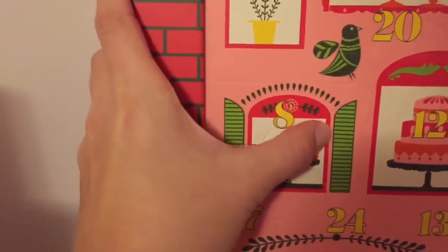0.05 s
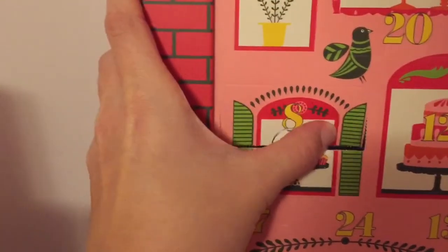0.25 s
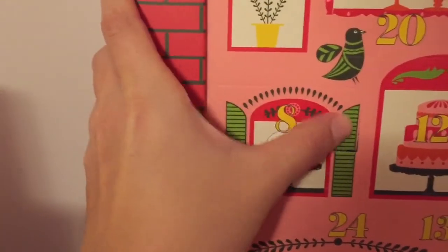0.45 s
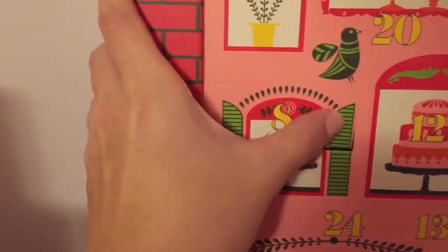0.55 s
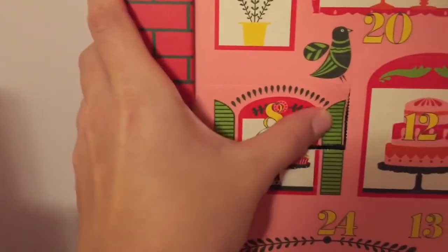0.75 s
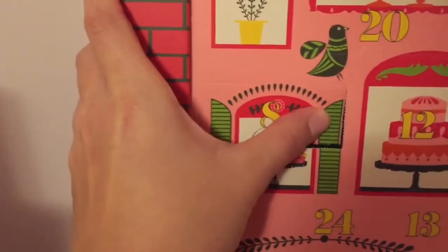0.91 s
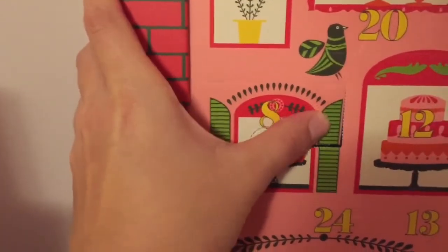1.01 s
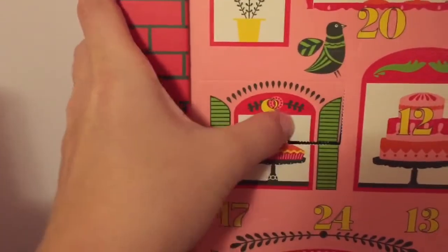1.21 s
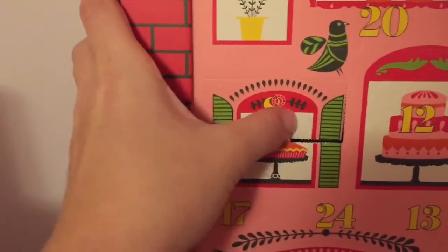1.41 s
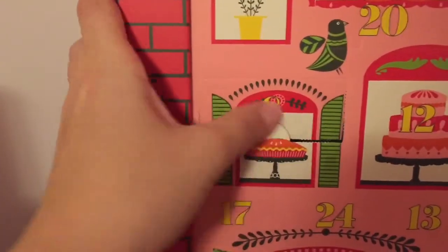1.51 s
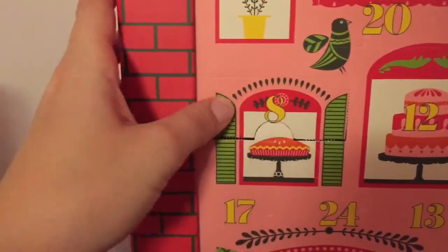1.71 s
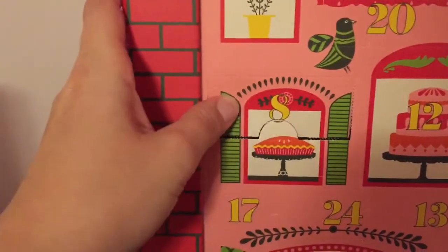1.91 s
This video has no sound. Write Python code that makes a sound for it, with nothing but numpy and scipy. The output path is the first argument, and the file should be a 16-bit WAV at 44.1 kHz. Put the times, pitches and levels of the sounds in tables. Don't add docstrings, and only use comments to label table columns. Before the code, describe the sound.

Cardboard flap tearing loose: a loud bright snap, crackling fibres, another big snap, then faint skin rubs

```python
import sys
import numpy as np
from scipy import signal
from scipy.fft import rfft, irfft
from scipy.io import wavfile
from scipy.ndimage import uniform_filter1d

SR = 44100
rng = np.random.default_rng(int(sys.argv[2]) if len(sys.argv) > 2 else 0)


def undo_db(level):
    steps = np.asarray(level, float) / 20
    return 10 ** steps


def waveform_to_disk(signal):
    frames = np.transpose(np.atleast_2d(signal))
    scaled = np.clip(frames, -1, 1) * 32767
    samples = np.round(scaled).astype(np.int16)
    wavfile.write(sys.argv[1], SR, samples)


N = 85995

# frequency in Hz, density in dB per Hz.
ROOM_SPECTRUM = [(18, -48.5), (30, -19), (71, -4), (384, -17.5), (511, -26.5), (735, -22.5), (794, -32),
                 (1090, -24.5), (15000, -39)]
# frequency in Hz, level in dB.
TAIL_COLOUR = [(150, -3.5), (500, -4.5), (1100, -10.5), (1900, -9.5), (3800, -3), (5300, -12.5),
               (7000, -4.5), (14000, -11)]
# frequency in Hz, level in dB, 60 dB decay time in seconds.
PANEL_MODES = [(340, -27, .025), (442, -19, 0.0099), (701, -7.5, 0.026), (869, 0.5, 0.015),
               (1071, 1.5, 0.017), (1632, 0.5, 0.011), (1703, -5.5, 0.011), (1832, -6.5, 0.031),
               (2401, 0.5, 0.0073), (2490, -0.5, 0.0054), (3380, -4, 0.006), (4260, -7.5, 0.011),
               (5368, -7, 0.0087), (6960, -22.5, .004)]
# frequency in Hz, level in dB.
CRACK_COLOUR = [(500, -26), (1500, 3.5), (3000, 5.5), (5500, 7.5), (8000, 5), (12000, 4.5), (15000, 0.5)]
# frequency in Hz, level in dB.
BEHIND_THUMB = [(8500, 0.5), (13000, -20)]
# frequency in Hz, density in dB per Hz.
SKIN_COLOUR = [(880, -28.5), (1150, -11), (1900, -10.5), (2400, -4), (3500, -9), (5500, -4), (9360, -7.5),
               (15000, -12)]
# time in seconds, hiss in dB, drag into the panel in dB.
THUMB_SLIDE = [(0.448, -65.5, -97), (0.462, -44.5, -47), (0.485, -54, -43.5), (0.493, -72, -80),
               (1.068, -72, -63.5), (1.108, -55.5, -64), (1.17, -53, -62.5), (1.20, -50.5, -54),
               (1.274, -68.5, -56), (1.297, -75, -72.5), (1.53, -75, -75), (1.543, -68, -56.5),
               (1.588, -49, -53), (1.628, -55, -60), (1.66, -55, -70.5), (1.738, -54.5, -67),
               (1.778, -70, -62.5), (1.813, -83, -61)]
# start in seconds, level in dB, pitch in Hz, length in ms.
SKIN_SLIPS = [(.2535, -16, 280.5, 2.84), (.281, -29, 303, 1.6), (.2945, -24.5, 1164, 1.4),
              (.317, -42.5, 187, 3.8), (.357, -47.5, 243, 4.2), (.452, -40, 735, 1.2),
              (.458, -37.5, 1045, 1.4), (.4725, -39, 1000, 0.89), (.472, -37.5, 2270, 0.95),
              (.478, -45, 982, 1.24), (1.427, -42.5, 832, 1.7), (1.816, -41, 906, 0.5),
              (1.8205, -40, 637, 1.15), (1.821, -43, 1094, 1.1), (1.828, -46, 940, 1.4),
              (1.17, -56.5, 1060, 1.2), (1.185, -46, 1090, 1.5), (1.195, -43, 1190, 3.3),
              (1.204, -49.5, 1510, 2.6), (1.211, -44.5, 1140, 2.1), (1.2218, -45.5, 1680, 0.59),
              (1.222, -47, 1124, 3.4), (1.235, -44.5, 1044, 2.5), (1.248, -60.5, 2500, 2),
              (1.267, -52, 1130, 1.8), (1.28, -53, 1120, 1.7), (1.538, -46.5, 717, 2.5),
              (1.548, -51.5, 2520, 0.75), (1.552, -44, 985, 1.6), (1.588, -47.5, 1710, 1.1),
              (1.603, -51, 1080, 2.5), (1.614, -45, 1060, 2.1), (1.6905, -46, 2400, 0.95),
              (1.694, -52, 1500, 1.35)]
# start in seconds, level in dB, pitch in Hz, push in ms.
BOX_THUDS = [(0.003, -52, 288, 28), (.247, -11.5, 226.8, 2.3), (0.296, -41.5, 208, 10),
             (0.341, -40, 206, 6), (0.453, -47, 249, 34), (0.4973, -28.5, 261, 1.35), (0.619, -43, 202, 19),
             (0.769, -33, 240, 11), (0.796, -13, 252, 1.76), (.99, -43.5, 180, 5.8),
             (1.193, -51.5, 228, 31), (1.358, -38.5, 198, 59), (1.383, -33, 195, 3.1),
             (1.397, -36, 165, 12.4), (1.667, -48, 149.7, 16.5), (1.814, -49, 170, 14.6),
             (1.846, -47.5, 128.7, 21)]
# start in seconds, level in dB, contact in ms.
PANEL_TAPS = [(.452, -39, 0.87), (.459, -54, 2.8), (.473, -34.5, 1.3), (.497, -49.5, 0.76),
              (.572, -44.5, 0.77), (0.596, -37.5, 4.3), (1.062, -32, 1.9), (1.363, -45.5, 16),
              (1.383, -37, 12), (1.401, -38.5, 2.7), (1.427, -41, 1.73), (1.538, -56, 2.7),
              (1.693, -59.5, 3.1), (1.8158, -33.5, 1.1), (1.8206, -44.5, 0.66)]
# start in seconds, crack
# in dB, panel ring in dB, tearing in ms.
FAINT_TICKS = [
    (.971, -49.5, -63, .6),
    (1.038, -54.5, -65, 1.7),
    (1.0565, -48, -65, 0.75),
    (1.366, -48, -50.5, .8),
    (1.4145, -41.5, -67, 2.5),
    (1.427, -42.5, -67, 0.58),
    (1.538, -46.5, -61.5, 0.81),
]
# start in seconds, crack in dB, panel ring in dB, tearing in ms.
DOOR_TEARS = [(.0273, -46.5, -51, 1.6), (.2255, -47, -36, 2.4), (.2438, -33.5, -48.5, 1.7),
              (.2553, -22.5, -14, 1), (.2583, -16, -25, 0.77), (.2622, -27, -15.5, 1.94),
              (.2858, -31.5, -21, 0.97), (.2945, -23, -19.5, 0.65), (.380, -34, -44.5, 1.3),
              (.402, -31, -49, 1.8), (.4128, -37, -38.5, 0.23), (.430, -52.5, -46, 0.76),
              (.4635, -52, -70, 1.4), (.572, -51, -39.5, 0.78), (.604, -47, -53.5, 0.72),
              (.6075, -26, -41, 5.3), (.634, -42.5, -43.5, 0.57), (.6365, -35.5, -41, 0.43),
              (.654, -54.5, -48.5, 0.91), (.6832, -42.5, -46.5, 1.5), (.6935, -39, -35, 0.66),
              (.713, -26, -72.5, 2.5), (.719, -49.5, -42.5, 1.5), (.750, -46, -42, 0.67)]
# start in seconds, crack in dB, panel ring in dB, tearing in ms.
LATE_FIBRES = [(.755, -58, -42, 0.72), (.758, -27, -63, 2.8), (.8025, -19.5, -38, 1.7),
               (.819, -35, -62, 0.99), (.823, -28, -65, 3.4), (.838, -40, -61, 0.39), (.850, -45, -54, 0.4),
               (.8515, -24, -53, 1.47), (.9545, -37, -75, 0.33), (.962, -40.5, -86, 0.67),
               (1.0076, -27.5, -49, 0.29), (1.062, -36, -50.5, 12), (1.0897, -21.5, -43.5, 0.4),
               (1.103, -35, -44, 1), (1.220, -54, -55, 1.22), (1.257, -42.5, -56, 0.94),
               (1.342, -33, -45, 0.54), (1.4145, -59.5, -46, 2.34), (1.427, -37.5, -70, 0.57),
               (1.550, -47.5, -66, 0.52), (1.587, -57, -54.5, 1.3), (1.8165, -50.5, -47, 0.49),
               (1.9465, -40.5, -36.5, 2)]
# start in seconds, crack in dB, panel ring in dB, tearing in ms, ring tilt in dB per octave.
WHOLE_BRIDGES = [
    (.2461, -13, -1.5, 1.22, 0),
    (.2484, -2, -0.5, 0.48, 3),
    (.7688, -13.5, -19, 0.08, 0.5),
    (.7967, -11, -0.5, 0.3, 1),
]
# one bridge, a level in dB per panel mode.
BRIDGE_SPOTS = [(3, 5.5, 5.5, 1, 4, 6, 2.5, -3.5, -8.5, -8, 0, -4.5, -1.5, 6),
                (0, 2.5, 3, -5.5, -2, 5, -1, -5, 3, -6, -1, -5, 6, 2.5),
                (-1.5, 0, 0.5, -6, 2.5, -6.5, -4.5, -6, 3, 9.5, 7, 7, -4, 6.5),
                (2.5, 4, 3, 4, 2, -8.5, -5.5, -15.5, 3.5, 1, -3.5, -6.5, -0.5, -4.5)]

ROOM_DB = -65.5
TAIL_DB, TAIL_T60_S, TAIL_HIGH_T60_S, TAIL_START_S = -11, 0.18, 0.14, 0.0037
BEND_LAG_S, NEAR_LAG_S, BEND_REF_HZ = 0.0028, 0.0007, 500
MODE_SCATTER_DB, MODE_SCATTER_RATIO, BRIDGE_SCATTER = 2, 0.025, 0.4
CREEP_PER_S, CREEP_START_S, CREEP_END_S = 1200, 0.228, 0.95
CREEP_DB, CREEP_SPREAD_DB, CREEP_RING_DB = -62, 2.5, -9.5
FLICKER_DB, STICK_DB = -0.5, 2.5
FIRST_DRAG_TILT_DB_OCT, SECOND_DRAG_TILT_DB_OCT, SECOND_STROKE_S = -8.5, 1.9, 0.83
DRAG_RING = 1.2
THUD_T60_S, THUD_SUB_DB = 0.023, -16.5
TAP_TILT_DB_OCT = -7
CRACK_SCATTER_DB = 1.5
RUSH_DB, RUSH_MS = -10.5, 4
MIC_LOW_HZ, CLIP, TOP_HZ = 100, 1.0, 15300


def unit(x):
    return x / np.sqrt(np.mean(x ** 2))


def colour(x, table, shift_db=0):
    hz, db = np.array(table, float).T
    f = np.maximum(np.arange(513) * SR / 1024, 1)
    log_gain = np.interp(np.log(f), np.log(hz), db + shift_db) * np.log(10) / 20
    cepstrum = irfft(log_gain)
    cepstrum[1:512] *= 2
    cepstrum[513:] = 0
    impulse = irfft(np.exp(rfft(cepstrum)))[:512]
    return signal.fftconvolve(x, impulse)[:len(x)]


def walk(rate):
    hold = int(SR / rate)
    steps = np.repeat(rng.standard_normal(N // hold + 1), hold)
    return 1.6 * uniform_filter1d(steps, hold)[:N]


def add(out, x, s):
    i = int(s * SR)
    out[i:i + len(x)] += x[:max(len(out) - i, 0)]


def decay(t, t60):
    return np.exp(-t * np.log(1000) / t60)


def room():
    f = np.maximum(np.arange(N // 2 + 1) * SR / N, 1)
    hz, db = np.array(ROOM_SPECTRUM).T
    gain = undo_db(np.interp(np.log(f), np.log(hz), db))
    bed = irfft(rfft(rng.standard_normal(N)) * gain, N)
    return unit(bed) * undo_db(ROOM_DB + 1.0 * walk(12))


def tail(x):
    t = np.arange(int(.4 * SR)) / SR
    noise = rng.standard_normal(len(t))
    low = signal.sosfilt(signal.butter(2, 3000, fs=SR, output="sos"), noise)
    fading = low * decay(t, TAIL_T60_S) + (noise - low) * decay(t, TAIL_HIGH_T60_S)
    response = colour(fading * (1 - np.exp(-t / TAIL_START_S)), TAIL_COLOUR)
    return undo_db(TAIL_DB) / 20 * signal.fftconvolve(x, response)[:N]


def ring(db, hz_scale, lag_s):
    hz, level_db, t60 = np.array(PANEL_MODES).T[:, :, None]
    lag = lag_s * (np.sqrt(BEND_REF_HZ / hz) - np.sqrt(BEND_REF_HZ / hz.max()))
    t = np.maximum(np.arange(2600) / SR - lag, 0)
    fade = (1 - np.exp(-t * hz)) * decay(t, t60)
    modes = undo_db(level_db + db) * fade * np.sin(2 * np.pi * hz * hz_scale * t)
    return modes.sum(0)


def burst(noise, ms, spike):
    fade = np.exp(-np.arange(len(noise)) / (SR * max(ms, .1) / 1000))
    rush = noise * np.abs(noise) * fade
    return np.r_[spike, rush[1:]] / np.sqrt(spike ** 2 + np.sum(rush ** 2))


def struck(z, ms, tilt_db, lag_s, scatter=1, spot_db=0):
    m = len(PANEL_MODES)
    octave = np.log2(np.array(PANEL_MODES)[:, :1] / 1000)
    db = scatter * MODE_SCATTER_DB * z[:m, None] + tilt_db * octave + spot_db
    hz_scale = 1 + scatter * MODE_SCATTER_RATIO * z[m:2 * m, None]
    return signal.fftconvolve(burst(z[100:1100], ms, 4), ring(db, hz_scale, lag_s))


def creep():
    t = np.arange(N) / SR
    on = (rng.random(N) < CREEP_PER_S / SR) * (t > CREEP_START_S) * (t < CREEP_END_S)
    level_db = CREEP_DB + CREEP_SPREAD_DB * rng.exponential(size=N) + 3.4 * walk(23)
    ticks = on * undo_db(level_db) * np.sign(rng.standard_normal(N))
    panel = signal.fftconvolve(ticks, ring(0, 1, NEAR_LAG_S))[:N]
    return colour(ticks, CRACK_COLOUR) + undo_db(CREEP_RING_DB) * panel


def drag(stick, tilt_db):
    out = np.zeros(N)
    t = np.arange(2600) / SR
    for k, (hz, db, t60) in enumerate(PANEL_MODES):
        mode = decay(t, t60 * DRAG_RING) * np.sin(2 * np.pi * hz * t)
        tilt = tilt_db * np.log2(max(hz / 1100, 1))
        own_moments = np.roll(stick, k * (N // len(PANEL_MODES)))
        out += undo_db(db + tilt) * signal.fftconvolve(own_moments, mode)[:N]
    return unit(out)


def thumb():
    s, hiss_db, drag_db = np.array(THUMB_SLIDE).T
    t = np.arange(N) / SR
    hiss = unit(colour(rng.standard_normal(N), [(300, -40)] + list(SKIN_COLOUR)))
    hiss = hiss * undo_db(FLICKER_DB * walk(140))
    stick = rng.standard_normal(N) * undo_db(STICK_DB * walk(200))
    first = drag(stick, FIRST_DRAG_TILT_DB_OCT)
    second = drag(stick, SECOND_DRAG_TILT_DB_OCT)
    shake = np.where(t < SECOND_STROKE_S, first, second)
    hiss_level = undo_db(np.interp(t, s, hiss_db, -99, -99))
    drag_level = undo_db(np.interp(t, s, drag_db, -99, -99))
    return hiss * hiss_level + shake * drag_level


def slips():
    out, t = np.zeros(N), np.arange(1500) / SR
    for s, db, hz, ms in SKIN_SLIPS:
        u = t * 1000 / max(ms, .2)
        add(out, undo_db(db) * u * np.exp(1 - u) * np.sin(2 * np.pi * hz * t), s)
    return out


def taps():
    out = np.zeros(N)
    for (s, db, ms), z in zip(PANEL_TAPS, rng.standard_normal((len(PANEL_TAPS), 1100))):
        add(out, undo_db(db) * struck(z, ms, TAP_TILT_DB_OCT, NEAR_LAG_S), s)
    return out


def thuds():
    out, t = np.zeros(N), np.arange(5000) / SR
    for (s, db, hz, ms), z in zip(BOX_THUDS, rng.standard_normal((len(BOX_THUDS), 5000))):
        air = np.sin(2 * np.pi * hz * t)
        whole_box = undo_db(THUD_SUB_DB) * np.sin(2 * np.pi * 0.64 * hz * t)
        overtone = undo_db(-6.0) * np.sin(2 * np.pi * 1.512 * hz * t)
        box = decay(t, THUD_T60_S) * (air + whole_box + overtone)
        push = uniform_filter1d(burst(z * z * z, ms, 1.8), size=16)
        thud = signal.fftconvolve(push, box)[:len(t)]
        add(out, -undo_db(db) * thud / np.abs(thud).max(), s)
    return out


def snaps(table, lag_s, scatter, spots=None):
    out = np.zeros(N)
    spots = np.zeros((len(table), 1)) if spots is None else np.array(spots, float)
    noises = rng.standard_normal((len(table), 3000))
    for (s, crack_db, ring_db, ms, *tilt_db), z, spot_db in zip(table, noises, spots):
        tear = burst(z, ms, 1.5) + undo_db(RUSH_DB) * burst(z[::-1], RUSH_MS, 0)
        own_colour_db = CRACK_SCATTER_DB * z[-len(CRACK_COLOUR):]
        add(out, 3 * undo_db(crack_db) * colour(tear, CRACK_COLOUR, own_colour_db), s)
        panel = struck(z[1200:], ms, sum(tilt_db), lag_s, scatter, spot_db[:, None])
        add(out, undo_db(ring_db) * panel, s)
    return out


def scene():
    near = snaps(DOOR_TEARS, NEAR_LAG_S, 0.95) + snaps(LATE_FIBRES, NEAR_LAG_S, 1)
    near += snaps(WHOLE_BRIDGES, BEND_LAG_S, BRIDGE_SCATTER, BRIDGE_SPOTS)
    near += taps() + thuds() + thumb() + creep() + slips()
    near = signal.sosfilt(signal.butter(2, MIC_LOW_HZ, "high", fs=SR, output="sos"), near)
    bed = tail(near) + room()
    faint = colour(snaps(FAINT_TICKS, NEAR_LAG_S, 0.79), BEHIND_THUMB)
    return (near + bed + faint)[None]


def roll_off(x):
    return signal.sosfilt(signal.butter(12, 15570, fs=SR, output="sos"), x)


def record(dry):
    clipped = np.clip(dry, -CLIP, CLIP)
    mix = signal.sosfilt(signal.ellip(6, .2, 40, TOP_HZ, fs=SR, output="sos"), clipped)
    return roll_off(np.clip(mix, -1, 1))


dry = scene()
out = record(dry)
waveform_to_disk(out)
```